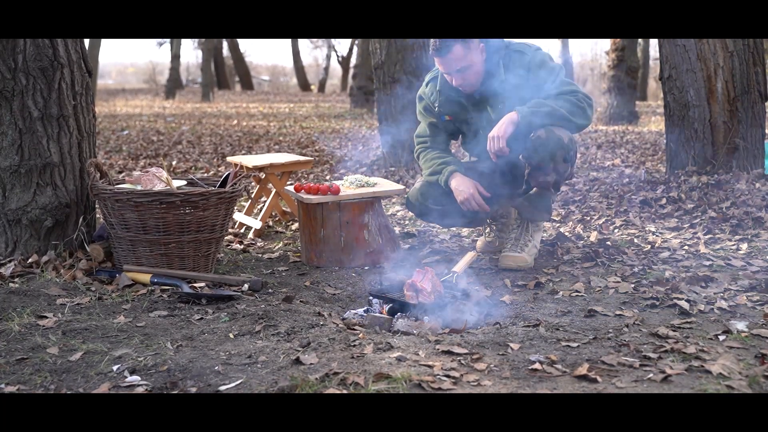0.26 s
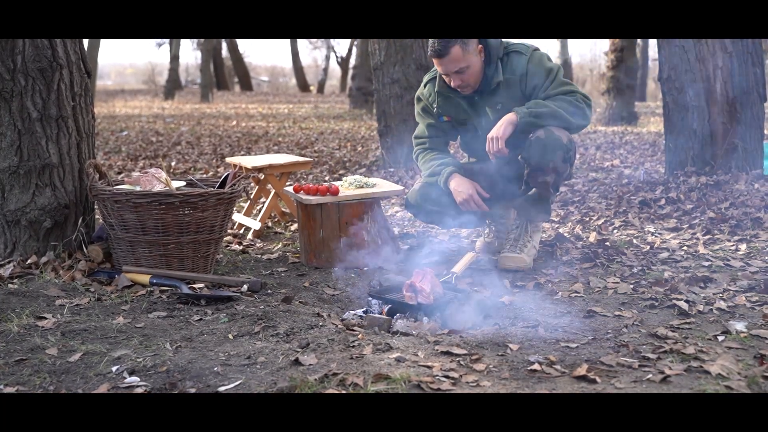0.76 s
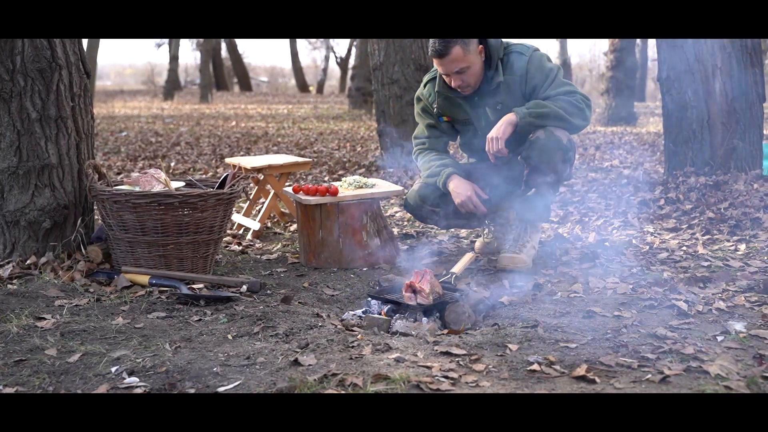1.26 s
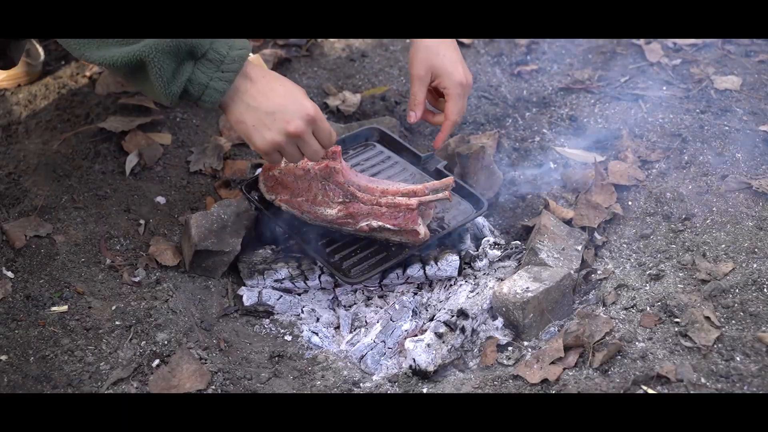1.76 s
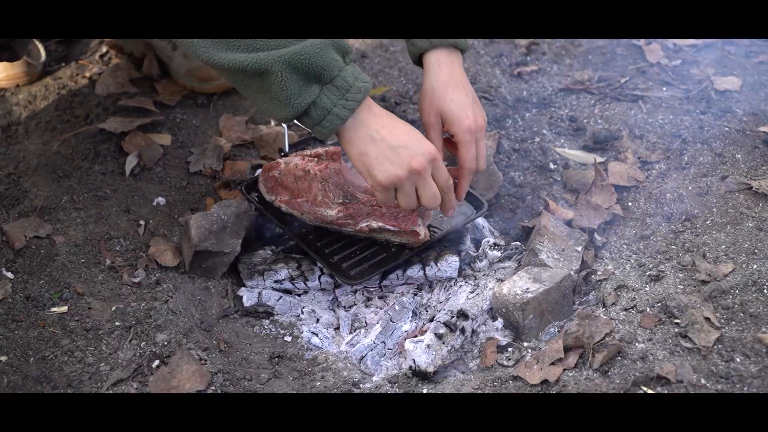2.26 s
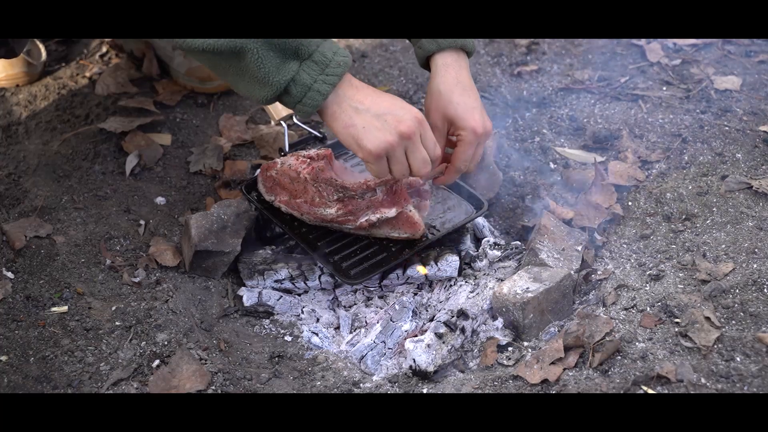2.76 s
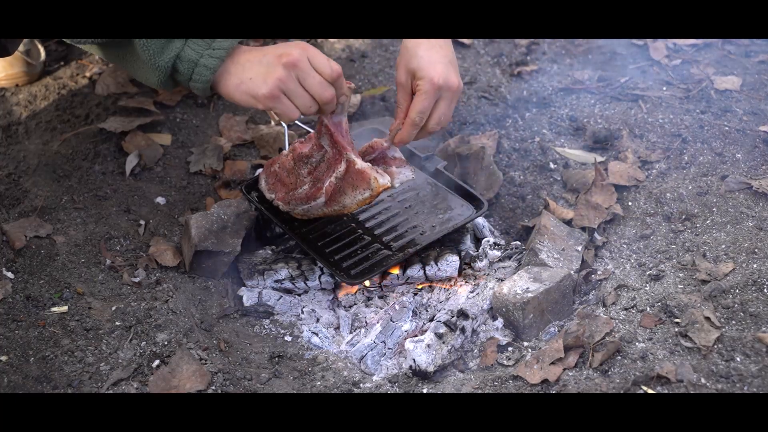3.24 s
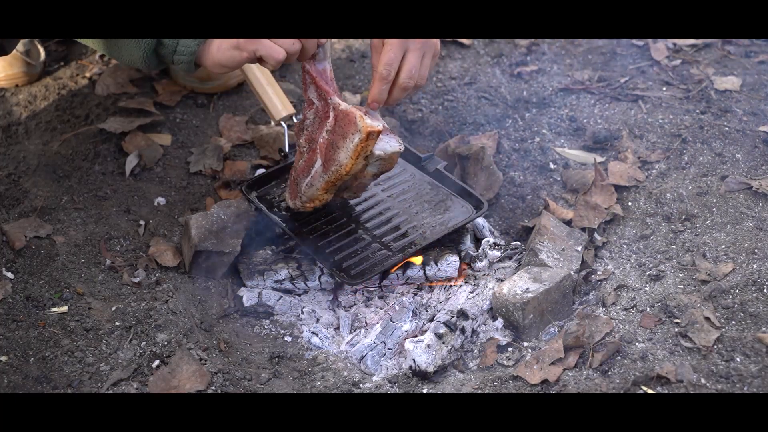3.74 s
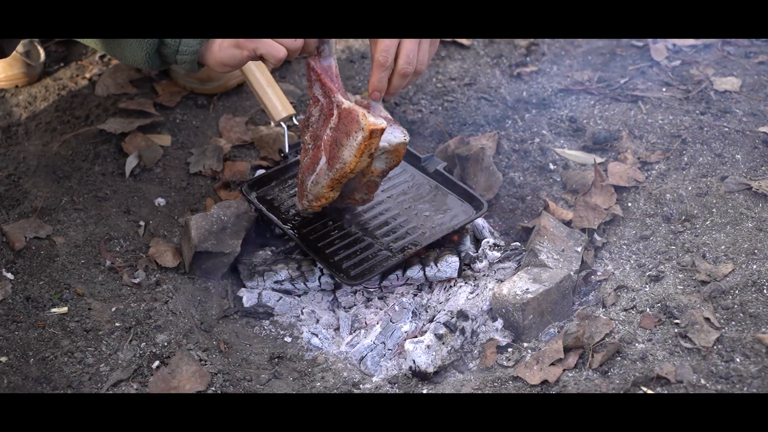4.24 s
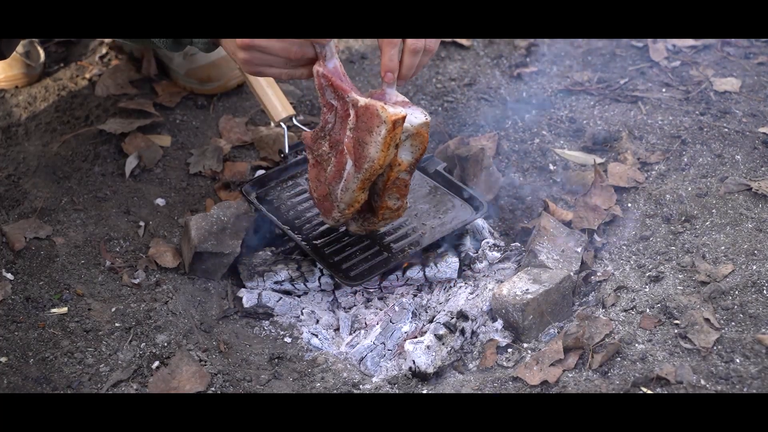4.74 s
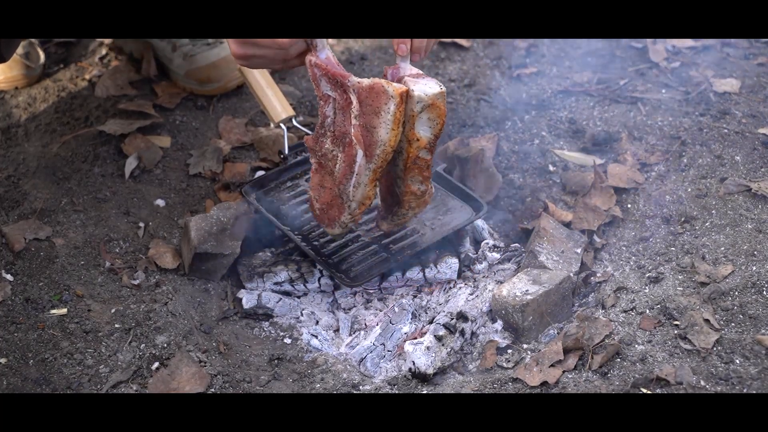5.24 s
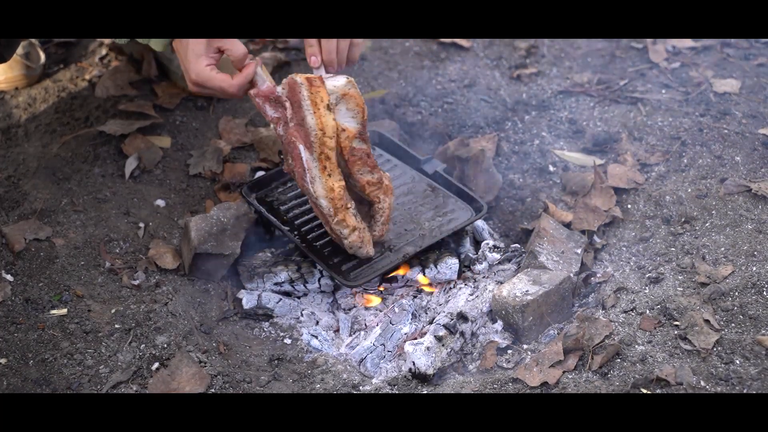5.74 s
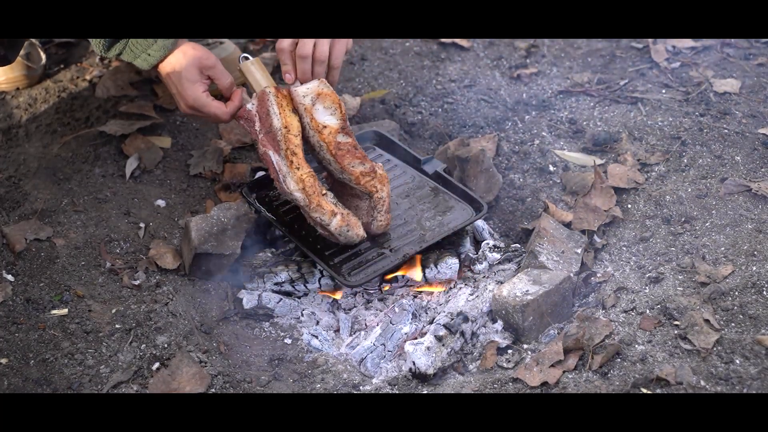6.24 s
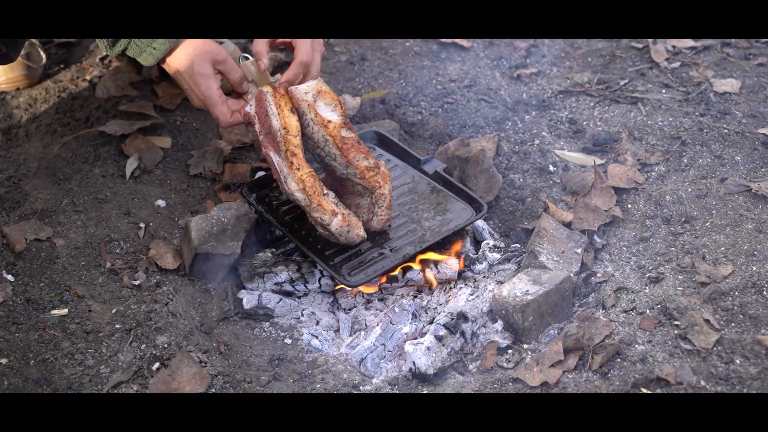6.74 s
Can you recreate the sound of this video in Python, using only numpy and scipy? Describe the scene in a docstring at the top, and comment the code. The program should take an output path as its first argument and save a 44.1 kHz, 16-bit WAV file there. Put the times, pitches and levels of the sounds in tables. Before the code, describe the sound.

A faint outdoor sizzle jumps close, crackling with fat pops and dry ember cracks, then surges brightly as meat is turned on hot iron.

```python
"""Pork sizzles in a cast-iron grill pan on embers outdoors, with fat popping, steam hissing and embers cracking.
It is heard from a few steps away, blurred by echoes off ground and trees, then from close by. As the meat is
peeled up, the pan and the gap under it ring hollow; it is lifted almost clear and set down on the hot iron.
A light breeze rumbles on the microphone and freshens later. The sizzle is made of random ringing bursts,
the pops of single short rings, and the steam, cracks, flames, wind and woods of filtered noise."""
import sys
import numpy as np
from scipy import signal
from scipy.fft import rfft, irfft
from scipy.io import wavfile
from scipy.ndimage import uniform_filter1d

SR = 44100
rng = np.random.default_rng(int(sys.argv[2]) if len(sys.argv) > 2 else 0)


def bounce(signal):
    """Save signal as a 16-bit WAV file at the path given by the first command-line argument."""
    frames = np.transpose(np.atleast_2d(signal))
    limited = np.clip(frames, -1, 1)
    pcm = np.round(limited * 32767).astype(np.int16)
    wavfile.write(sys.argv[1], SR, pcm)


N = 308259
TIME, HZ = np.arange(N) / SR, np.fft.rfftfreq(N, 1 / SR)
CLOSE_FROM = 1.464  # s; from here the pan is heard from close by
BRISK_DB = -31  # level of a brisk sizzle, the reference for boiling and popping


def amp(db):
    """Decibels to gain."""
    return np.exp(np.asarray(db) * np.log(10) / 20)


def evened(x):
    """Scales to rms 1."""
    return x / np.sqrt(np.mean(x ** 2) + 1e-20)


def read(points):
    """A spectrum table on every frequency bin, drawn over log frequency."""
    hz, value = np.transpose(points)
    return np.interp(np.log(HZ + 1), np.log(hz + 1), value)


def curves(rows):
    """The columns of a time table on every sample."""
    s, *columns = np.transpose(rows)
    return [np.interp(TIME, s, column) for column in columns]


def ramp(middle_s, length_s):
    """A steady change from 0 to 1."""
    return np.clip((TIME - middle_s) / length_s + .5, 0, 1)


def add(mix, s, sound):
    """Lays a sound into the mix at time s."""
    part = mix[round(s * SR):][:len(sound)]
    part += sound[:len(part)]


def shaped(x, gain):
    """Filters by a gain per frequency bin."""
    return irfft(rfft(x) * gain, N)


def below(hz, order):
    """Gain of a smooth low-pass crossover."""
    return 1 / (1 + (HZ / hz) ** order)


def swelled(steady_db, events):
    """A steady level plus swells that rise and die away, summed as power, in dB."""
    power = amp(steady_db) ** 2
    age = np.arange(SR) / SR
    for s, db, rise_s, fade_s in events:
        rise = np.minimum(age / rise_s, 1)
        fade = np.exp(-np.maximum(age - rise_s, 0) / fade_s)
        add(power, max(s, 0), (amp(db) * rise * fade) ** 2)
    return 10 * np.log10(power)


def bubble(hz, cycles):
    """One burst: a quick rise and a ring that dies by 1/e in the given cycles, peak 1."""
    turns = hz * np.arange(900) / SR
    life = turns / max(cycles, .2)
    ring = np.sin(2 * np.pi * turns) * np.exp(-life) * (1 - np.exp(-4 * life))
    return ring / abs(ring).max()


def bursts(per_s, spread_db):
    """Random impulses of steady mean power: many small, a few large."""
    at = np.flatnonzero(rng.random(N) < per_s / SR)
    size = amp(spread_db * np.minimum(rng.exponential(1, len(at)), 4.5))
    train = np.zeros(N)
    train[at] = size * rng.choice([-1, 1], len(at)) / np.sqrt(per_s[at])
    return train


def flurry(clump_db, size):
    """Sound comes in clumps: a random gain that changes over about size samples."""
    at = np.arange(0, N, size / 8)
    steps = rng.standard_normal(len(at))
    wander = evened(uniform_filter1d(uniform_filter1d(steps, size=8), size=8))
    return np.interp(TIME, at / SR, evened(amp(clump_db * wander)))


# Steady sizzle, set by how much wet meat touches the iron: lying flat, peeled up, lifted clear, set down.
# Each row: time in seconds, level in dB. Heard from close by only.
CONTACT_LEVEL = [(1.47, -40), (1.88, -42.5), (2.6, -41), (2.87, -41), (3.03, -38), (3.45, -37.5),
                 (3.6, -35.5), (3.8, -34.5), (3.98, -30.5), (4.35, -31), (4.55, -33), (4.81, -32),
                 (4.91, -36.5), (5.33, -40), (5.5, -45), (5.66, -46), (5.735, -30), (6.35, -31.5),
                 (7, -34.5)]
# Surges, when a fresh patch of meat meets the hot iron.
# Each row: start in seconds, peak in dB, rising time in seconds, fading time in seconds.
CONTACT_SURGES = [(0, -51, .02, 0.045), (.76, -63, .06, 0.096), (1.08, -45.5, 0.044, 0.13),
                  (1.21, -44, 0.023, 0.22), (1.46, -43, .01, .09), (1.58, -37.5, .11, 0.064),
                  (3.265, -35.5, .025, 0.091), (3.485, -39, 0.019, .14), (4.12, -32, 0.061, .06),
                  (4.31, -31.5, 0.039, .05), (4.92, -27, .02, .14), (5.07, -35, .025, .1),
                  (5.375, -39.5, 0.024, 0.041), (5.72, -28.5, 0.036, 0.064), (5.84, -28.5, .11, .08),
                  (6.16, -32.5, 0.041, 0.058)]


def sizzle_level(afar, far_db=-51):
    """More wet meat on the iron sizzles louder; the level in dB on every sample."""
    contact_db, = curves(CONTACT_LEVEL)
    return swelled(np.where(afar, far_db, contact_db), CONTACT_SURGES)


def bubble_rate(afar, lifted, level_db, far_per_s=5000, flat_per_s=16000, upright_per_s=13000, boil_slope=1.0):
    """Fine bubbles bursting per second; with the meat on end, a louder sizzle boils faster."""
    # upright_per_s holds at the brisk level; boil_slope is dB more bubbles for each dB of sizzle
    upright = upright_per_s * amp(boil_slope * (level_db - BRISK_DB))
    close = (1 - lifted) * flat_per_s + lifted * upright
    return np.where(afar, far_per_s, close)


def ringing(per_s, cycles, spread_db, count=20):
    """Bubbles of every size ring at their own pitches; together they are roughly white."""
    pitches = np.geomspace(900, 16000, count)
    rings = np.zeros(N)
    for hz in pitches:
        # alike bubbles come in families, so each pitch swells and fades on its own
        family = flurry(2.8, size=1100)
        share = np.sqrt(hz) / np.sqrt(pitches).sum()
        train = bursts(per_s * share, spread_db) * family
        rings += np.sqrt(hz) * evened(signal.oaconvolve(train, bubble(hz, cycles))[:N])
    return evened(rings)


def spits(per_s=260, spread_db=2.5, power_fade_s=0.0024):
    """Each spit throws out a spray of droplets: a gain that jumps up and dies away."""
    jumps = bursts(np.full(N, 1.) * per_s, spread_db) ** 2
    power = signal.lfilter([1], [1, -np.exp(-1 / (power_fade_s * SR))], jumps)
    return np.sqrt(power / power.mean())


def crackle(per_s, snap_spread_db=4.0, snap_db=-3, spit_db=-6):
    """Fine bubbles, fewer fat ones that ring longer, dry snaps of bursting films, and short spits."""
    fine = ringing(per_s, cycles=1.34, spread_db=3.5)
    fat = amp(-3) * shaped(ringing(per_s / 4, cycles=4, spread_db=2.8), below(8000, order=4))
    snaps = evened(bursts(per_s * .4, snap_spread_db))
    spray = spits() * rng.standard_normal(N)
    surge = flurry(.5, size=400)
    return (fine + fat + amp(snap_db) * snaps + amp(spit_db) * spray) * surge


# Colour of the sizzle: from afar, smothered under the flat meat, and with the meat on end.
# Each row: frequency in Hz, relative dB per Hz; it shapes each of the three bands, whose levels are set apart.
FAR_COLOUR = [(590, -46), (1000, -20), (1450, -15), (1980, -7.5), (2410, -8.5), (3120, -9), (3750, -11.5),
              (4070, -7.5), (4900, -5), (6940, -2.5), (7530, -4), (8960, -4.5), (12500, -15), (14800, -16),
              (16000, -23.5)]
FLAT_COLOUR = [(500, -43), (1100, -8.5), (1600, -7.5), (2300, -3), (3200, -6.5), (4000, -2.5), (4800, -2),
               (5400, 2), (6200, 6), (7700, 4), (8800, 5.5), (11000, -3), (13000, -2), (16000, -8.5)]
UPRIGHT_COLOUR = [(500, -20.5), (800, -22), (1100, -23), (1550, -13.5), (2300, -9.5), (3300, -10.5),
                  (4100, -6), (5200, -6), (6600, -1), (8800, 1), (10400, -5.5), (14500, -8.5), (16000, -12)]
# Juice running onto the iron makes a wet, low spatter.
# Each row: time in seconds, level in dB relative to the sizzle, before the trim of each view.
JUICE_SPATTER = [(0, -8), (1.05, -5.5), (1.3, -11), (1.7, -11), (1.9, -9.5), (2.8, -11), (2.95, -7.5),
                 (3.35, -10), (3.5, -4.5), (3.85, -6.5), (4.4, -9.5), (4.92, -10.5), (5.15, -13.5),
                 (5.62, -10.5), (5.7, -4.5), (5.92, -13), (6.1, -9), (6.9, -6.5)]
# The fine, high spray.
# Each row: time in seconds, level in dB relative to the sizzle, before the trim of each view.
FINE_SPRAY = [(1.4, -10), (1.5, -4), (1.87, -3.5), (2.0, -4), (3.3, -4.5), (3.6, -8), (3.95, -2.5),
              (4.45, -2.5), (5.05, -5), (5.5, -2), (6.3, -5)]


def sizzle(source, level_db, colour, spatter_trim_db, fizz_trim_db, spray_trim_db):
    """Large wet bubbles spatter low, small ones fizz, the finest spray hisses on top; each wavers on its own."""
    (spatter_db,), (spray_db,) = curves(JUICE_SPATTER), curves(FINE_SPRAY)
    tone = amp(read(colour))
    large, small = below(5110, order=16), below(10670, order=16)
    spatter = evened(shaped(source, tone * large)) * amp(spatter_db + spatter_trim_db)
    fizz = evened(shaped(source, tone * (small - large))) * amp(fizz_trim_db)
    spray = evened(shaped(source, tone * (1 - small))) * amp(spray_db + spray_trim_db)
    return amp(level_db) * sum(part * flurry(0.58, size=1200) for part in (spatter, fizz, spray))


def trees(x, level_db=-12, t60=.25, dull_hz=6500):
    """From afar, part of the sizzle comes back off ground and trunks from all sides, as decaying noise tails."""
    t = np.arange(9000) / SR
    tails = rng.standard_normal((2, len(t))) * amp(-60 * t / t60)
    dull = shaped(x, below(dull_hz, order=6))
    sides = [signal.oaconvolve(dull, tail / np.linalg.norm(tail))[:N] for tail in tails]
    return amp(level_db) * np.array(sides)


# Colour of the still air of the woods. Each row: frequency in Hz, relative dB per Hz.
WOODS_COLOUR = [(20, -26), (80, -4.5), (140, -5.5), (250, -11), (400, -14.5), (600, -18), (780, -15.5),
                (1100, -21), (1600, -32.5), (4000, -42.5)]


def woods(far_db=-57, close_db=-56, side_db=-8):
    """A soft, dull outdoor background: shaped noise, widened by a weaker side signal."""
    mid, side = evened(shaped(rng.standard_normal((2, N)), amp(read(WOODS_COLOUR))))
    air_db = np.where(TIME < CLOSE_FROM, far_db, close_db)
    return amp(air_db) * np.array([mid + amp(side_db) * side, mid - amp(side_db) * side])


# Gusts on the microphone, before the trim of each port.
# Each row: peak time in seconds, level in dB, half length in seconds (where the power is down to 1/e).
WIND_GUSTS = [(0.123, -46.5, 0.1), (0.41, -43.5, 0.12), (1.004, -45.5, 0.08), (1.17, -38.5, 0.089),
              (1.52, -45, 0.076), (2.033, -44.5, 0.033), (2.25, -43, 0.051), (2.42, -50, 0.077),
              (4.1, -44, 0.2), (4.58, -38, .07), (4.772, -37.5, 0.074), (5.15, -32, 0.053),
              (5.324, -33.5, 0.055), (5.79, -38, 0.038), (6.102, -37, 0.16), (6.73, -36.5, 0.039),
              (6.91, -35, 0.068)]
# Colour of the wind. Each row: frequency in Hz, relative dB per Hz.
WIND_COLOUR = [(12, -9.5), (25, 2), (42, -3.5), (65, -4), (100, -14.5), (160, -24.5), (300, -39),
               (600, -58.5), (1500, -92)]


def wind(left_db=3.0, right_db=4.5, strong_db=-36, brightening=0.042, same_air=0.47):
    """Lumpy turbulence, mostly unrelated at the two ports; strong gusts carry a little more above 66 Hz."""
    light_db, fresh_db = -57, -41.5  # the breeze between gusts, before the port trims
    breeze = amp(light_db + (fresh_db - light_db) * ramp(4.57, 1))
    gusts = sum(amp(db) ** 2 * np.exp(-((TIME - s) / half_s) ** 2) for s, db, half_s in WIND_GUSTS)
    gust_db = 10 * np.log10(breeze ** 2 + gusts)
    tone = amp(read(WIND_COLOUR))
    left, right, both = (evened(shaped(rng.standard_normal(N) * flurry(2.56, size=1500), tone)) for _ in range(3))
    # same_air: gain of the turbulence that both ports feel, against 1 for their own
    left_eddies = amp(left_db) * evened(left + same_air * both)
    right_eddies = amp(right_db) * evened(right + same_air * both)
    eddies = np.array([left_eddies, right_eddies])
    slow = shaped(eddies, below(66, order=4))
    fast_gain = amp(brightening * (gust_db - strong_db))  # brightening in dB per dB of gust
    return amp(gust_db) * (slow + (eddies - slow) * fast_gain)


# Flames fluttering in the embers under the pan. Each row: time in seconds, level in dB.
FLAME_LEVEL = [(1.4, -66), (2.4, -65.5), (2.8, -55), (3.7, -58), (4.5, -54), (5.6, -53), (5.8, -47),
               (6.3, -55), (7, -51.5)]
# Colour of the flutter. Each row: frequency in Hz, relative dB per Hz.
FLUTTER_COLOUR = [(30, -31), (60, -19), (85, 3), (115, -4.5), (200, -7), (300, -16.5), (500, -25.5),
                  (1200, -50)]


def flames():
    """Dripping fat flares up with a low, soft flutter of lumpy noise."""
    flame_db, = curves(FLAME_LEVEL)
    lumpy = rng.standard_normal(N) * flurry(0.58, size=1200)
    return amp(flame_db) * evened(shaped(lumpy, amp(read(FLUTTER_COLOUR))))


def pop(hz, cycles):
    """A drop of fat bursts, peak 1; so small a source radiates little below its pitch."""
    ring = np.gradient(bubble(hz, cycles))
    return ring / abs(ring).max()


def droplets(sizzle_db, low_hz=4600, high_hz=10000, brisk_peak_db=-24, follow=0.63, spread_db=5, cycles=4.9, count=70):
    """Lesser drops pop at random, louder as the sizzle grows; the small, high ones die soonest."""
    out = np.zeros(N)
    for when, pitch, size in rng.random((count, 3)):
        at, hz = int(when * N), low_hz * (high_hz / low_hz) ** pitch
        db = brisk_peak_db + follow * (sizzle_db[at] - BRISK_DB) + spread_db * (size - .5)
        add(out, at / SR, amp(db) * pop(hz, cycles * (1 - .5 * pitch)))
    return out


# The loudest drops of fat popping.
# Each row: start in seconds, pitch in Hz, peak in dB before the trim, ring in cycles.
FAT_POPS = [(.0693, 6850, -28, 1.2), (0.1027, 3030, -39, 4.8), (0.24, 4530, -36, 2.6),
            (.8042, 6030, -25, 1.1), (.8867, 4850, -36, 3), (1.237, 5000, -26, 3.5), (1.4, 3140, -37.5, 3),
            (1.4664, 6700, -28, 3.4), (1.6237, 4930, -24, 2.2), (1.7727, 7900, -20, 2),
            (2.232, 5500, -25, 2.9), (2.326, 4400, -23, 4.1), (2.41, 4820, -28, 4),
            (2.4495, 5270, -27, 5.2), (2.488, 4450, -30, 3.4), (2.6279, 5460, -23, 3),
            (2.6435, 5230, -22.5, 2.5), (2.7757, 5500, -25, 4.5), (2.82, 5500, -28, 6),
            (2.9587, 6900, -16, 3.6), (3.387, 3230, -26, 2.4), (3.4508, 1800, -24, 1.5),
            (3.4906, 4730, -14, 1.2), (3.522, 1710, -29, 1.8), (3.6251, 6370, -12, 1.8),
            (4.1193, 8700, -5, 0.64), (4.1712, 9400, -10, 1.1), (4.3348, 6550, -10.5, 2),
            (4.356, 10500, -7, 1.4), (4.423, 9900, -5.5, 0.55), (4.6055, 9200, -6, 1.2),
            (4.9305, 2873, -23, 5.3), (5.1917, 4600, -23.5, 2.44), (5.2532, 5850, -20.5, 2.4),
            (5.2913, 4700, -27.5, 3.7), (5.3819, 10000, -15, 1.06), (5.5691, 6100, -32.5, 10.6),
            (5.6363, 7030, -17.5, 3.5), (5.65, 9200, -15.5, 2.8), (5.8251, 3626, -21, 1.63),
            (6.0636, 7100, -10, 1), (6.723, 4850, -18, 2.07)]


def pops(trim_db=-1):
    """Single drops of fat burst louder than the rest, each a short ring."""
    out = np.zeros(N)
    for s, hz, db, cycles in FAT_POPS:
        add(out, s, amp(db + trim_db) * pop(hz, cycles))
    return out


# Steam hissing out through narrow vents in the meat.
# Each row: start in seconds, end in seconds, centre in Hz, width in Hz, level in dB before trim and fades.
STEAM_VENTS = [(0.09, 0.141, 2800, 1200, -50.5), (1.475, 2.202, 6250, 746, -51),
               (1.8, 2.297, 3800, 550, -53), (1.8, 2.15, 9100, 650, -52), (2.1, 2.65, 10000, 450, -53),
               (2.25, 2.85, 8600, 450, -59), (2.878, 3.1, 2570, 500, -53), (2.956, 3.062, 6830, 500, -45),
               (3.4, 3.476, 6450, 700, -40), (3.527, 3.626, 4000, 1300, -40),
               (4.943, 5.042, 4600, 1100, -39.5)]


def steam(trim_db=-1):
    """Each vent sputters in its own narrow resonance until it closes again."""
    out, flow = np.zeros(N), rng.standard_normal(N) * flurry(2.5, size=200)
    for start, end, hz, width_hz, db in STEAM_VENTS:
        band = signal.butter(2, [hz - width_hz / 2, hz + width_hz / 2], "bandpass", fs=SR)
        hiss = evened(signal.lfilter(*band, flow[round(start * SR):round(end * SR)]))
        add(out, start, amp(db + trim_db) * hiss * signal.windows.tukey(len(hiss), .5))
    return out


# Dry cracks from the embers and the searing crust.
# Each row: start in seconds, peak in dB before the trim, lowest frequency in Hz, fading time in seconds.
DRY_CRACKS = [(.1028, -33, 2000, .001), (.8444, -27, 3030, 0.001), (1.6343, -18.5, 744, 0.001),
              (1.692, -21, 600, 0.0022), (2.539, -24, 1810, 0.0014), (2.6885, -20, 900, 0.00033),
              (2.9014, -18, 1410, 0.00052), (3.0868, -16.5, 1590, 0.0017), (3.096, -24, 800, 0.0022),
              (3.3865, -21, 2000, .0012), (3.4889, -17, 1440, 0.0013), (3.5225, -23, 900, 0.00068),
              (3.5487, -21, 1348, 0.0013), (4.6051, -14, 1610, 0.00026), (5.4059, -23, 1500, 0.00025)]


def dry_cracks(trim_db=-3, top_hz=9000):
    """A crack is a burst of tiny fractures, band-passed noise that is over in a few milliseconds."""
    out, t = np.zeros(N), np.arange(600) / SR
    grits = rng.standard_normal((len(DRY_CRACKS), len(t)))
    for (s, db, low_hz, fade_s), grit in zip(DRY_CRACKS, grits):
        band = signal.butter(4, [low_hz, top_hz], "bandpass", fs=SR, output="sos")
        crack = signal.sosfilt(band, grit * np.exp(-t / fade_s))
        add(out, s, amp(db + trim_db) * crack / abs(crack).max())
    return out


def resonate(x, hz, width_hz):
    """A resonance that can follow a moving frequency."""
    turn = np.exp(2j * np.pi * np.cumsum(hz * np.ones(N)) / SR)
    r = np.exp(-np.pi * width_hz / SR)
    return 2 * (turn * signal.lfilter([1 - r], [1, -r], x / turn)).real


# The meat shifts and uncovers the pan's hollow ring.
# Each row: start in seconds, peak in dB before the trim, rising time in seconds, fading time in seconds.
MEAT_SHIFTS = [(1.58, -61, .07, .08), (2.04, -54, 0.054, 0.053), (2.65, -58, .04, .04),
               (3.24, -52, .03, .04), (3.72, -51.5, 0.041, 0.13), (4.0, -55.5, 0.088, .2)]
# The gap that opens as the meat is peeled off the iron.
# Each row: time in seconds, resonance in Hz, level in dB.
OPENING_GAP = [(2.6, 1010, -70), (2.85, 1150, -57), (3.0, 1400, -53.5), (3.2, 1650, -47),
               (3.5, 1800, -48.5), (3.7, 1800, -52), (4.1, 1420, -50.5), (4.8, 1390, -62)]


def hollows(lifted, pan_hz=880, pan_width_hz=210, pan_trim_db=-2, gap_width_hz=600):
    """Bursts ring the pan and the gap under the meat, each through two equal resonances in a row."""
    drive = bursts(np.full(N, 900.), 1.7)
    flat_db, upright_db = -61.5, -68.5  # the pan's steady ring, before the trim
    ring_db = swelled(flat_db + lifted * (upright_db - flat_db), MEAT_SHIFTS)
    gap_hz, gap_db = curves(OPENING_GAP)
    pan = resonate(resonate(drive, pan_hz, pan_width_hz), pan_hz, pan_width_hz)
    gap = resonate(resonate(drive, gap_hz, gap_width_hz), gap_hz, gap_width_hz)
    return evened(pan) * amp(ring_db + pan_trim_db) + evened(gap) * amp(gap_db)


def echoes(x, t60):
    """Brief scatter from the pan's rim and the ground; each bubble lies elsewhere, so the paths keep changing."""
    t = np.arange(3000) / SR
    tail = rng.standard_normal(len(t)) * amp(-60 * t / t60) * (t > .0007)
    paths = evened(shaped(rng.standard_normal(N), below(490, order=4)))
    return np.tanh(3 * paths) * signal.oaconvolve(x, tail / np.linalg.norm(tail))[:N]


# How the two microphone ports differ.
# Each row: frequency in Hz, phase in radians by which the left leads.
PORT_LEAD = [(4800, 0), (5400, .25), (6000, 0), (7100, 0), (7800, .45), (8600, .45), (9700, -.3),
             (11000, .3), (12800, .1), (14000, .9), (16000, .3)]
# Each row: frequency in Hz, scattered sound in dB.
PORT_SCATTER = [(1500, -32), (4200, -30), (5300, -17), (6200, -22), (7600, -13.5), (12500, -13.5),
                (13600, -8), (15000, -11)]
# Each row: frequency in Hz, left minus right in dB.
PORT_BALANCE = [(6900, 0), (7600, -1.5), (8800, 3.3), (9400, 2.5), (10500, -3.5), (12000, -.5),
                (13400, -3.5), (14400, 0)]


def ports(x, echo_db=-15):
    """The pan lies straight ahead; it is mostly the treble that differs between the two ports."""
    centre = x + amp(echo_db) * echoes(x, t60=0.057)
    bearing = evened(shaped(rng.standard_normal(N), below(320, order=4)))  # bubbles lie all over the pan
    side = shaped(centre * bearing, amp(read(PORT_SCATTER)))
    turn = np.exp(.5j * read(PORT_LEAD)) * amp(read(PORT_BALANCE) / 2)
    return np.array([shaped(centre, turn) + side, shaped(centre, 1 / turn) - side])


def scene():
    """The pan from afar, then from close by as the meat is stood on end, with flames, wind and open air."""
    afar = TIME < CLOSE_FROM
    lifted = ramp(3.26, 0.38)  # the meat is half way up at 3.26 s
    level_db = sizzle_level(afar)
    source = crackle(bubble_rate(afar, lifted, level_db))
    far = sizzle(source, level_db, FAR_COLOUR, spatter_trim_db=1.1, fizz_trim_db=-3.0, spray_trim_db=-1.5)
    flat = sizzle(source, level_db, FLAT_COLOUR, spatter_trim_db=1.34, fizz_trim_db=-1.5, spray_trim_db=-0.5)
    upright = sizzle(source, level_db, UPRIGHT_COLOUR,
                     spatter_trim_db=-0.6, fizz_trim_db=-0.58, spray_trim_db=0.5)
    near = (1 - lifted) * flat + lifted * upright + hollows(lifted)
    pan = np.where(afar, far, near) + droplets(level_db) + pops() + steam() + dry_cracks()
    return ports(pan) + trees(far * afar) + woods() + wind() + flames()


def record(dry, edge_hz=15950):
    """The band limit: a steep low-pass takes off the highest treble."""
    taps = signal.firwin(511, edge_hz, window=("kaiser", 9), fs=SR)
    return signal.oaconvolve(dry, taps[None], "same")


dry = scene()
out = record(dry)
bounce(out)
```